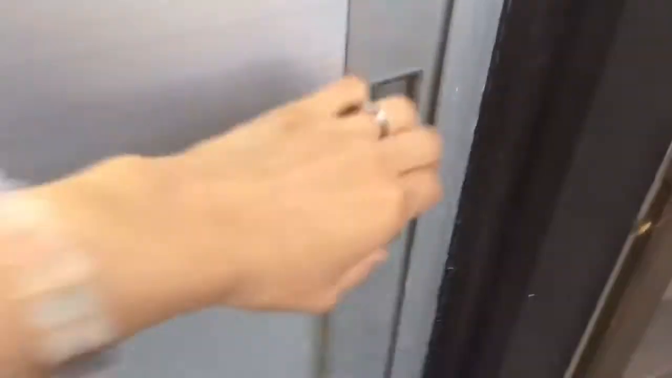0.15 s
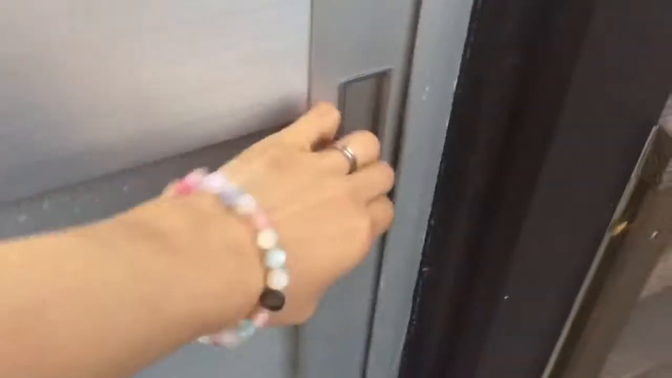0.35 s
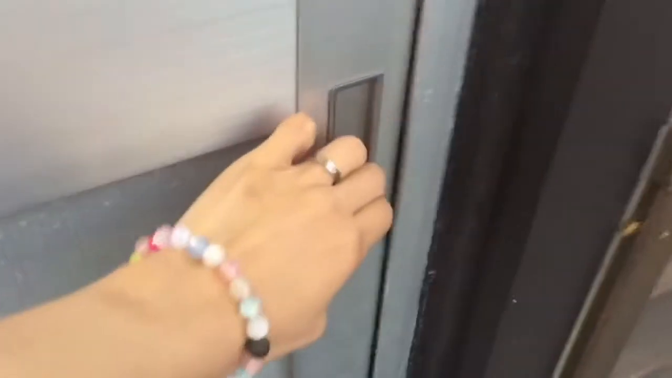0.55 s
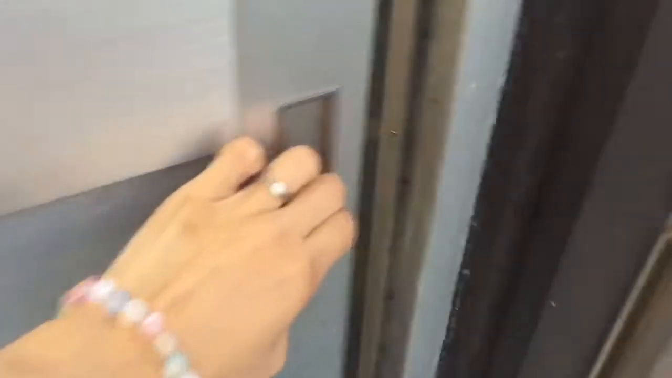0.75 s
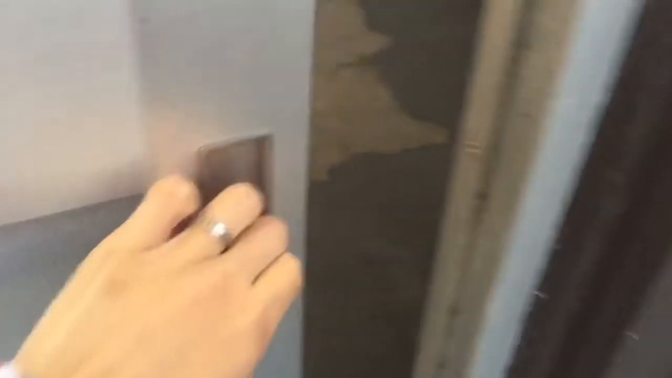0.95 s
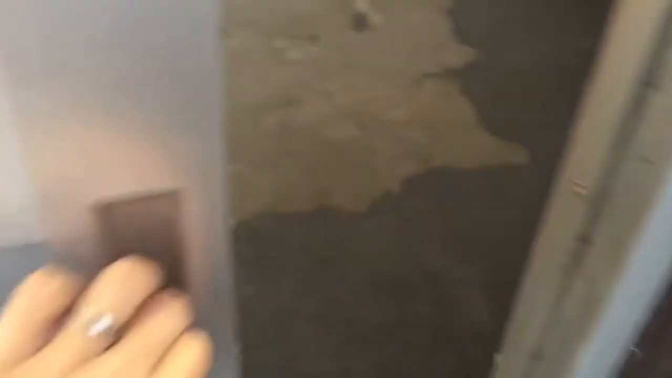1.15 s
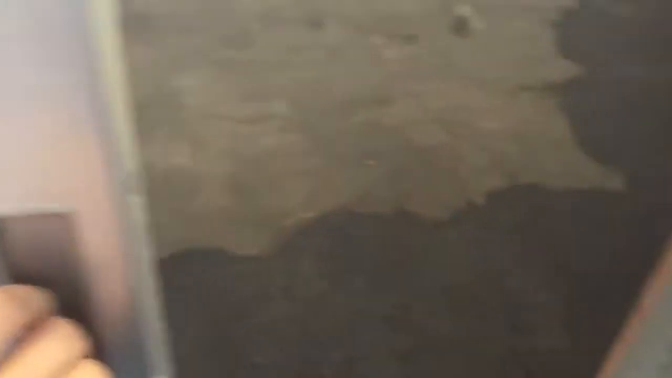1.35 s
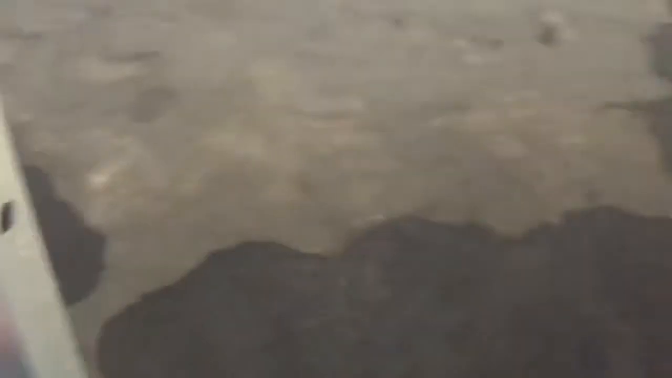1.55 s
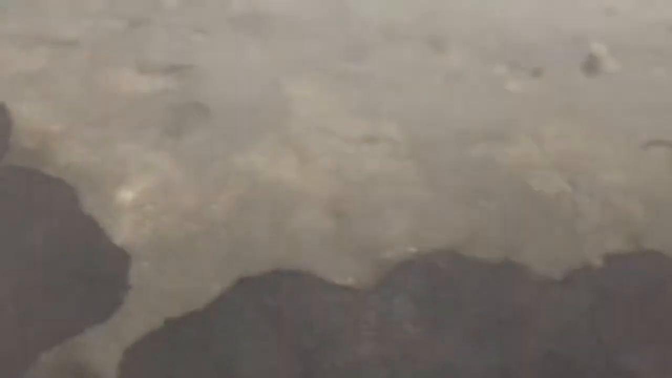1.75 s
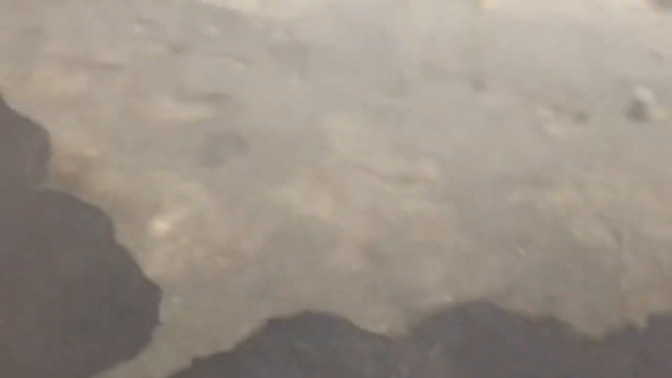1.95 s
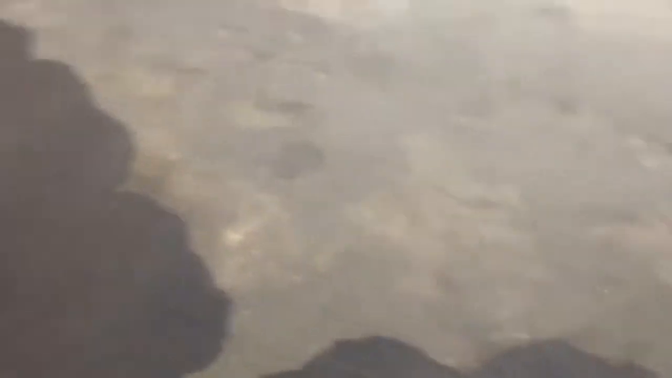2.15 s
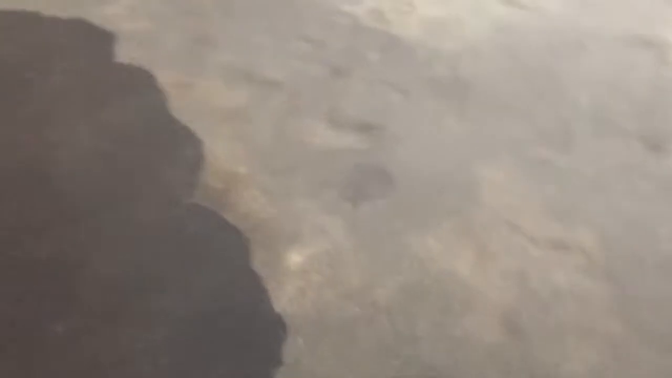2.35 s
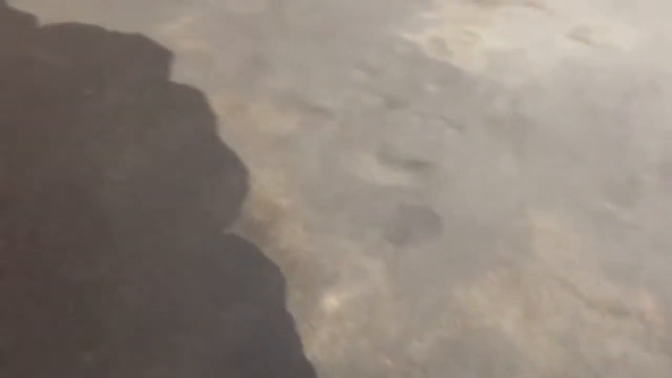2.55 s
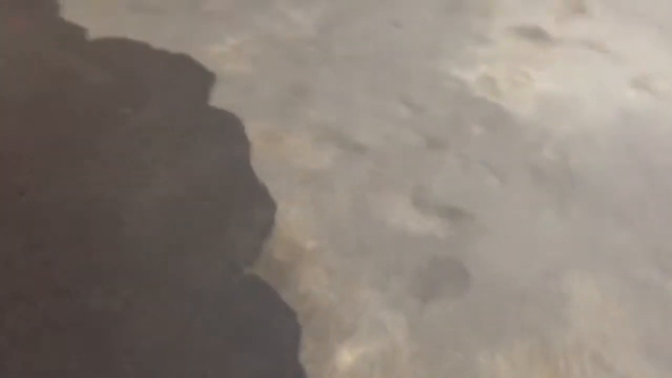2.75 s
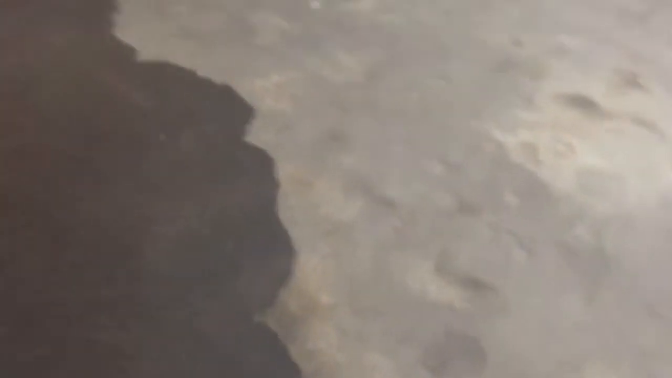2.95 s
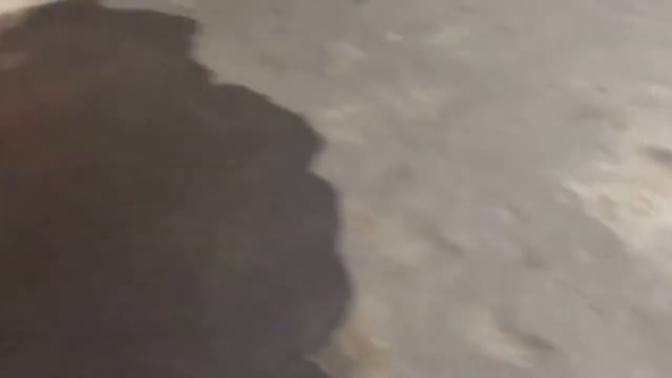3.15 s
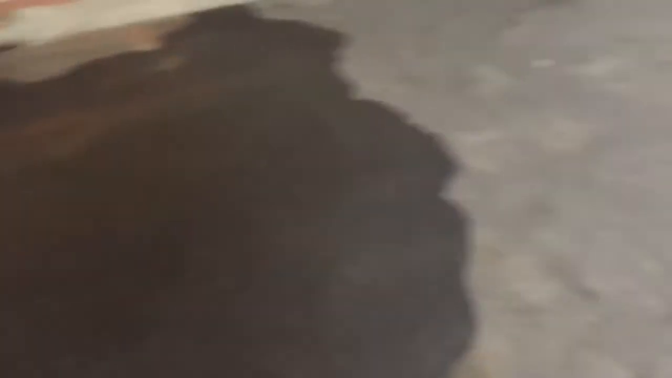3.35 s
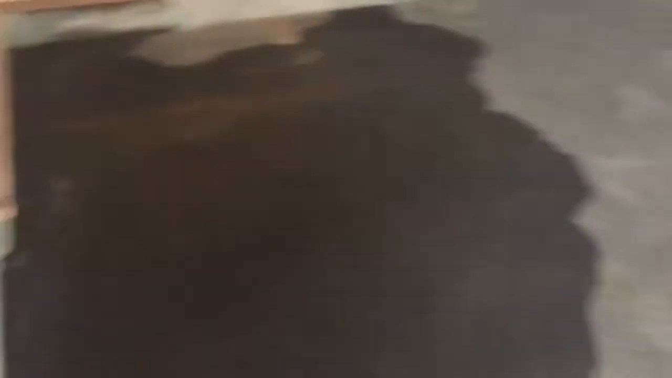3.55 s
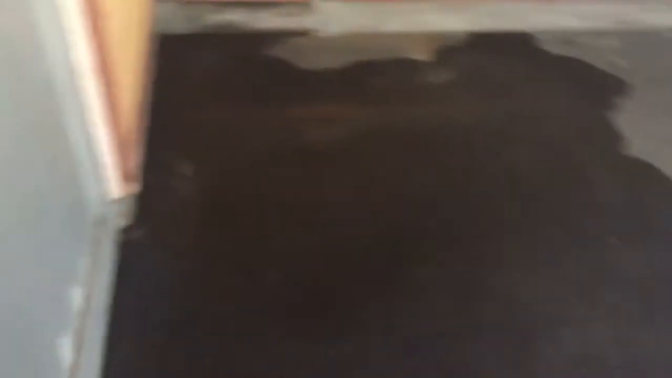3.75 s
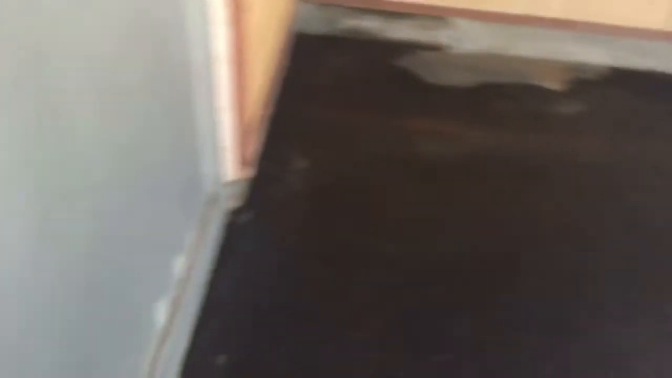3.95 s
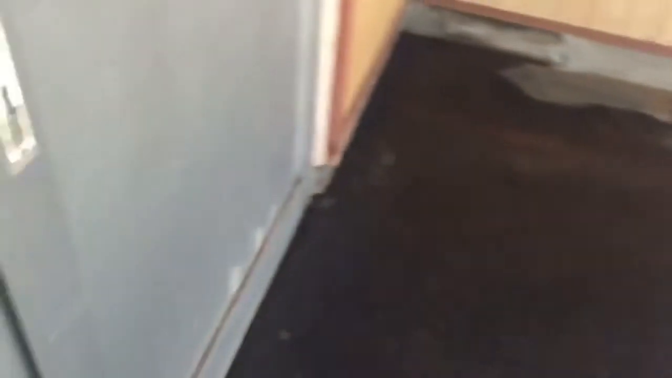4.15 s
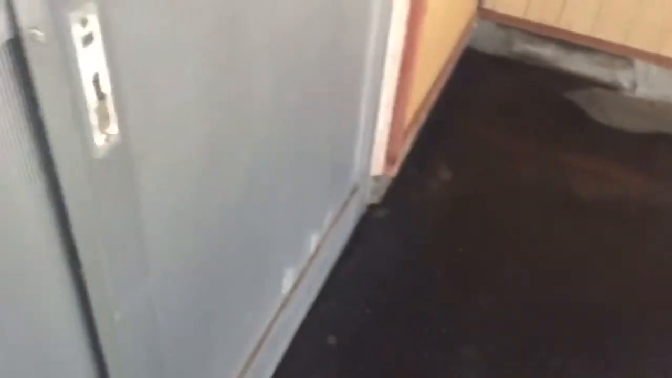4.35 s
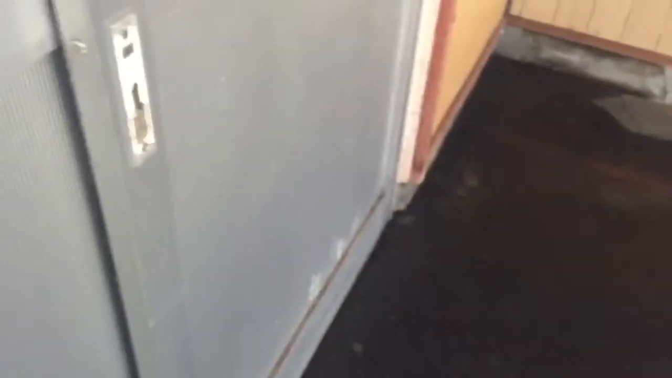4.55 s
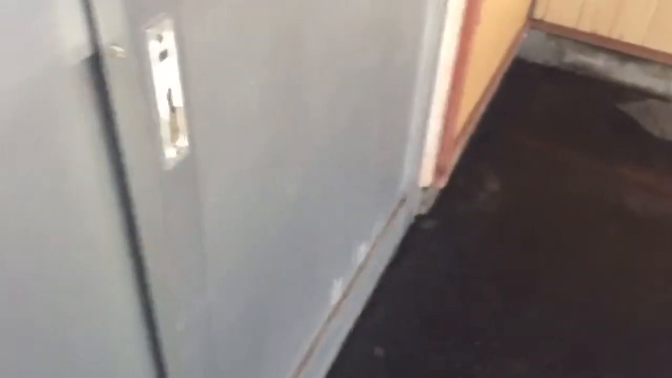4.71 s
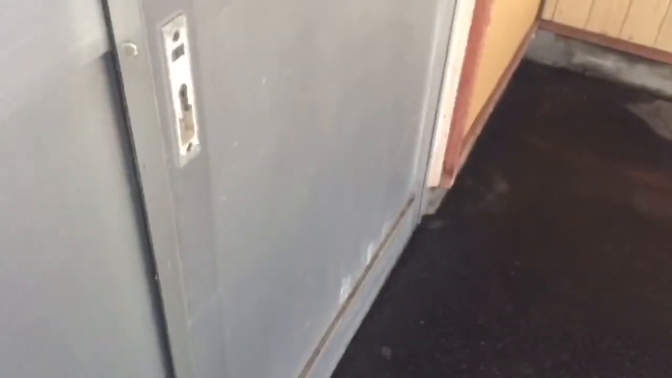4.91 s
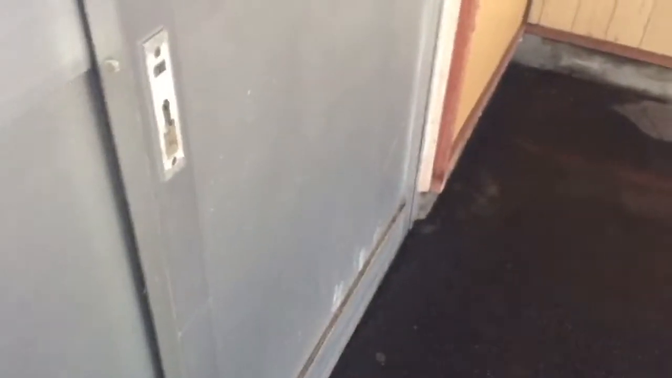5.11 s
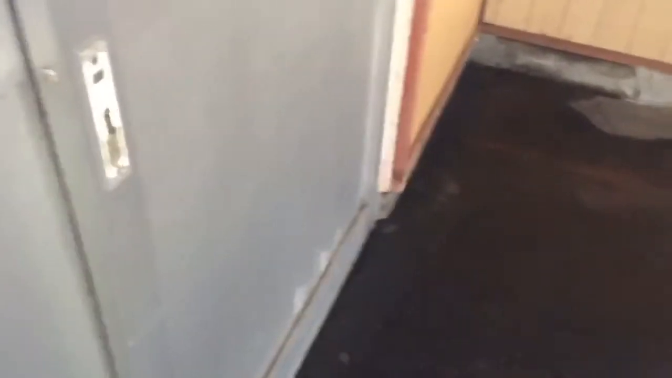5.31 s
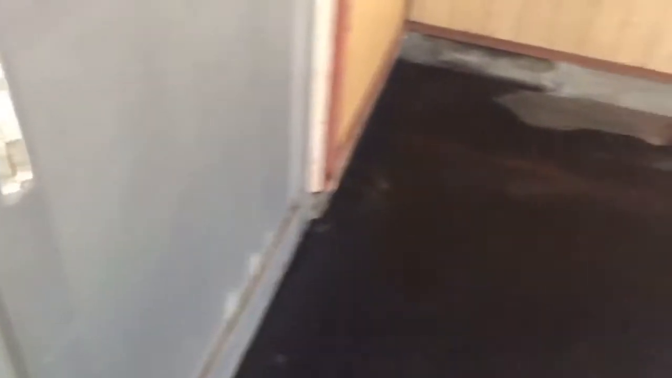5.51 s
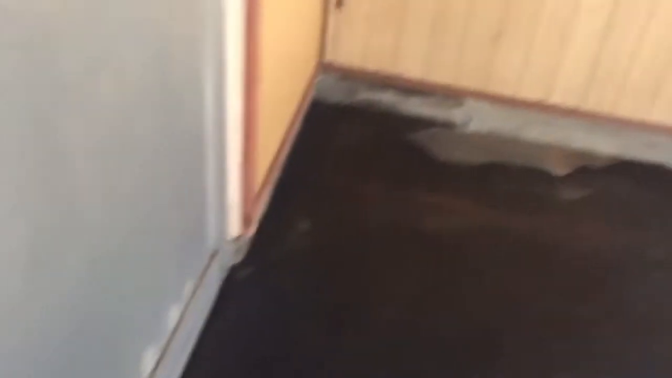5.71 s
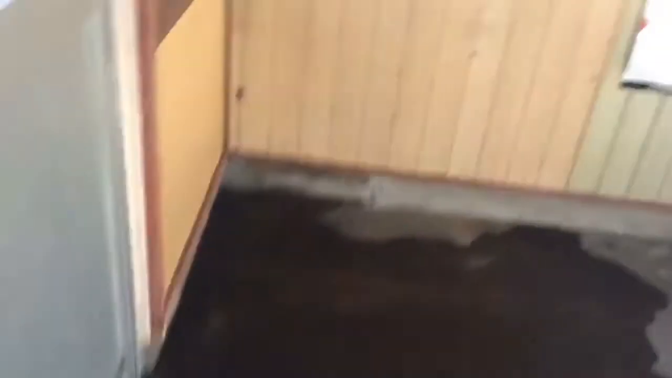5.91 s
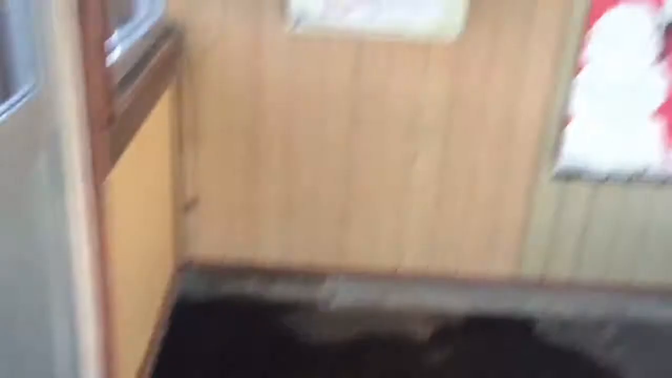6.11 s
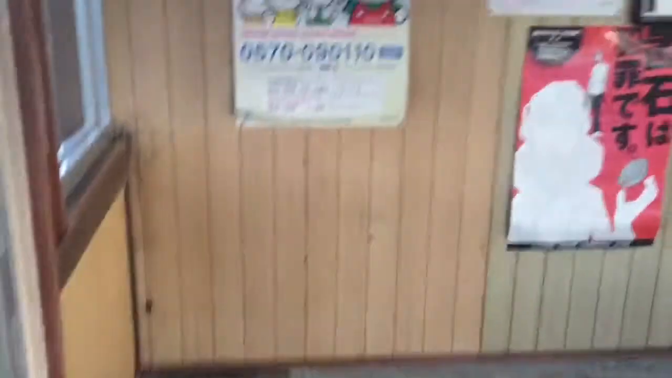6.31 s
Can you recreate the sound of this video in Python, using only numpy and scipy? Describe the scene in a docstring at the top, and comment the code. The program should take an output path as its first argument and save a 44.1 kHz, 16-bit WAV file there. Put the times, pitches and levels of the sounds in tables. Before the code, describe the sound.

After faint bead clicks, an aluminium door rumbles open along its track, falls quiet, then rattles closed and ends in two solid thumps.

```python
"""A faint outdoor hiss with small bead clicks comes first, then a knock and fingers brushing metal.
A light metal-framed door is rolled open along its track, left, and rolled shut again at a small entrance.
Rough rollers shake panel and frame, a roller's flaw ticks among a few gritty snaps, the frame scuffs its guide.
Knocks, footfalls, jolts of the rolling door and small metal rings sound around it. Noise bands make the hiss;
random bumps drive resonances for rolling and rubbing; dying sines and noise bursts make the separate blows."""
import sys
import numpy as np
from scipy import signal
from scipy.fft import rfft, irfft
from scipy.io import wavfile

SR = 44100
rng = np.random.default_rng(int(sys.argv[2]) if len(sys.argv) > 2 else 0)


def linear_from_db(decibels):
    """Turn decibels (scalar or array-like) into linear amplitude factors; 0 gives 1."""
    return 10 ** (np.asarray(decibels, float) / 20)


def materialize(psi):
    """Save the field psi as 16-bit PCM at rate SR to the path in sys.argv[1].

    A 1-D psi becomes a single channel; in a 2-D psi each row is a channel.
    """
    bounded = np.clip(np.atleast_2d(psi).T, -1, 1)
    quanta = np.round(bounded * 32767).astype(np.int16)
    wavfile.write(sys.argv[1], SR, quanta)


N = 285471   # length [samples]


def rms_one(x):
    """Scale to unit rms."""
    return x / np.sqrt(np.mean(x ** 2) + 1e-20)


def in_time(rows):
    """Draw each column of a timed table as a curve, sample by sample."""
    s, *columns = np.transpose(rows)
    return np.array([np.interp(np.arange(N) / SR, s, c) for c in columns])


def drift(rate):
    """Slow random wandering of spread 1: noise smoothed twice with a corner at rate [Hz]."""
    r = np.exp(-80 * np.pi * rate / SR)   # one step every 40 samples
    noise = rng.standard_normal(N // 40 + 2002)
    slow = signal.lfilter([1], [1, -2 * r, r * r], noise)[2000:]   # skip the filter's start
    return np.interp(np.arange(N) / 40, np.arange(len(slow)), rms_one(slow))


def coloured(x, spectrum):
    """Shape steady noise by a spectrum; rms 1."""
    hz, db = np.transpose(spectrum)
    grid = np.fft.rfftfreq(len(x), 1 / SR) + 1
    gain = linear_from_db(np.interp(np.log(grid), np.log(hz), db))
    return rms_one(irfft(rfft(x) * gain, len(x)))


def resonance(x, hz, width_hz):
    """Let through one band, like something that rings at hz; gain 1 on top."""
    r = np.exp(-np.pi * width_hz / SR)
    feedback = [1, -2 * r * np.cos(2 * np.pi * hz / SR), r * r]
    return signal.lfilter(np.array([1, 0, -1]) * (1 - r * r) / 2, feedback, x)


def ring(count, hz, t60):
    """A dying sine that falls 60 dB in t60 seconds."""
    t = np.arange(count) / SR
    return np.sin(2 * np.pi * hz * t) * linear_from_db(-60 * t / t60)


def add(out, s, sound):
    """Mix a sound in at time s."""
    i = round(s * SR)
    out[i:i + len(sound)] += sound[:N - i]


def roughness(per_s, spread_db, lumpy_db):
    """Bumps on a rough surface: random clicks of uneven size, coming in lumps."""
    sizes = linear_from_db(spread_db * np.minimum(rng.exponential(1, N), 4)) * rng.standard_normal(N)
    hits = rng.random(N) < per_s / SR
    return sizes * hits * linear_from_db(lumpy_db * drift(11.5)) + 1e-18


def shaken(modes, force, wander_db):
    """Resonances side by side under one force; each swells and fades as the contact moves."""
    total = 0
    for k, (hz, width, db) in enumerate(modes):
        # filtered twice so that the gaps between resonances stay quiet
        mode = resonance(resonance(force, hz, width), hz, 0.93 * width)
        total = total + (-1) ** k * linear_from_db(db + wander_db * drift(9.7)) * mode
    return rms_one(total)


# surroundings: (time [s], street hiss level [dB], room tone level [dB], whine level [dB])
AIR = [(0, -64.5, -81, -76), (.7, -61.5, -86, -82), (2.3, -83, -65.5, -69), (3.1, -70, -67, -107),
       (4.5, -91, -71, -96), (6.47, -77, -67.5, -85)]
# colour of the street hiss: (pitch [Hz], relative level [dB])
STREET_COLOUR = [(15, -16), (40, 4), (527, -19.5), (981, -18.5), (1930, -26), (2390, -10.5), (2810, -20.5),
                 (4330, -24), (10800, -36), (15800, -18.5)]
# colour of the room tone: (pitch [Hz], relative level [dB])
ROOM_COLOUR = [(15, -54), (30, -5), (60, 10), (174, 0.5), (812, -11.5), (981, -11), (1470, -12),
               (7830, -21), (8730, -23.5), (15800, -25.5)]
WHINE_HZ, WHINE_WIDTH_HZ = 2344, 61


def surroundings():
    """Street hiss, room tone and a faint narrow whine are steady noises that follow level curves."""
    street, room, whine = linear_from_db(in_time(AIR))
    narrow = resonance(rng.standard_normal(N), WHINE_HZ, WHINE_WIDTH_HZ)
    narrow = resonance(narrow, WHINE_HZ, WHINE_WIDTH_HZ)
    out = street * coloured(rng.standard_normal(N), STREET_COLOUR)
    out += room * coloured(rng.standard_normal(N), ROOM_COLOUR)
    return out + whine * rms_one(narrow)


# beads and nails clicking: (time [s], level [dB], crack pitch [Hz], ringing level against the click [dB])
BEAD_CLICKS = [(0.017, -49, 13100, -7), (0.023, -38.5, 3260, -12), (0.2142, -40, 2450, -32),
               (0.433, -39, 8300, 0), (0.497, -54.5, 8420, 3.5), (0.551, -40, 8000, -1),
               (1.159, -42, 3000, -11), (3.378, -59, 4500, -30), (3.569, -42.5, 7200, -8),
               (4.282, -39, 14000, -22)]
# ringing of a bead: (pitch [Hz], typical level [dB], time to fall 60 dB [s])
BEAD_MODES = [(5670, -9.5, 0.028), (8650, -5, 0.061), (2460, -9, 0.056), (13500, -4, 0.015)]


def beads():
    """Each click is a tiny dry crack; it strikes every mode with a strength of its own."""
    out, t = np.zeros(N), np.arange(4000) / SR
    strengths = rng.normal(0, 3, (len(BEAD_CLICKS), len(BEAD_MODES)))   # [dB]
    for (s, db, crack_hz, ring_db), own in zip(BEAD_CLICKS, strengths):
        tone = sum(linear_from_db(level_db + o) * ring(len(t), hz, t60)
                   for (hz, level_db, t60), o in zip(BEAD_MODES, own))
        noise = rng.standard_normal(len(t))
        width = 0.89 * crack_hz
        band = resonance(resonance(noise, crack_hz, width), crack_hz, width)
        crack = rms_one(linear_from_db(-18) * noise + band) * linear_from_db(-60 * t / 0.028)
        add(out, s, linear_from_db(db) * (linear_from_db(ring_db) * tone + crack / 2))
    return out


# knocks, footfalls and jolts of the rolling door:
# (time [s], level [dB], centre pitch [Hz], crack against blow [dB], hollow ring against blow [dB])
BLOWS = [(0.297, -40.5, 380, -8, -12), (1.082, -22.5, 210, -37, -26), (1.111, -24, 666, -29, -4.5),
         (2.5242, -44, 2200, -10, -11.5), (2.5853, -27.5, 746, -24, -11), (3.1925, -35.5, 760, 10.5, -11.5),
         (3.2216, -25, 715, -25, -7.5), (3.785, -28, 564, -13, -5), (3.842, -25.5, 910, -32, -7),
         (4.084, -25.5, 800, -5.5, -3.5), (4.335, -31.5, 600, 10.5, -2), (4.399, -27.5, 557, -18, -2),
         (4.7704, -22, 830, -30, -11.5), (4.782, -28, 770, -19, -12), (5.435, -23.5, 840, -13, -8),
         (5.903, -47, 350, -3, -7.5), (5.914, -34.5, 345, -3.5, -25), (6.184, -38.5, 303, -25, -34)]
# the entrance's hollow ring: (pitch [Hz], width [Hz], level before the lean [dB], time to fall 60 dB [s])
ENTRANCE = [(350, 160, -6, 0.25), (600, 69, -13, 0.32), (735, 206, -8, 0.53), (876, 200, -18, 0.7),
            (1250, 226, -7.5, 0.54), (1550, 230, -8.5, 0.37), (1940, 380, -9.5, 0.15),
            (2520, 330, -14, 0.51), (3250, 380, -33, 0.31)]
HOLLOW_LEAN_DB = 2   # the ring weakens per octave away from the blow's centre
BOUNCE_S, BOUNCE_DB = 0.0095, -8   # every blow bounces once


def knocks_footfalls_and_jolts():
    """A rounded blow and a crack; the entrance rings on as dying noise."""
    out, t = np.zeros(N), np.arange(SR // 2) / SR
    for s, db, hz, crack_db, hollow_db in BLOWS:
        noise = rng.standard_normal((2, len(t)))
        soft = (1 - np.exp(-t * hz * 4.84)) ** 2   # contact lasts a part of a cycle
        tone = ring(len(t), hz, 7.0 / hz)
        tone += linear_from_db(2.0) * ring(len(t), 1.43 * hz, 2.56 / hz)
        tone += linear_from_db(-30.5) * ring(len(t), 2.44 * hz, 8.4 / hz)
        blow = 2 * soft * tone
        burst = linear_from_db(crack_db - 60 * t / 0.0092) * noise[0]
        crack = 2.1 * resonance(resonance(resonance(burst, 1200, 2200), 1600, 3100), 1400, 3100)
        swell = 1 - np.exp(-t / 0.00093)   # echoes need a moment to build
        sharp = linear_from_db(crack_db / 2)   # a harder crack wakes the upper modes more
        hollow = 0
        for f, width, level_db, t60 in ENTRANCE:
            lean_db = HOLLOW_LEAN_DB * abs(np.log2(f / hz))
            band = rms_one(resonance(resonance(noise[1], f, width), f, 1.13 * width))
            hollow = hollow + linear_from_db(level_db - lean_db - 60 * t / t60) * (sharp if f > 1100 else 1) * band
        add(out, s + BOUNCE_S, linear_from_db(db + BOUNCE_DB) * (blow + crack))
        add(out, s, linear_from_db(db) * (blow + crack + linear_from_db(hollow_db) * swell * hollow))
    return out


# weight lands on floor or jamb: (time [s], level [dB])
THUDS = [(0.298, -38), (4.78, -19), (5.434, -15.5), (5.916, -28), (6.187, -32.5), (6.209, -38)]


def thuds():
    """Floor and jamb answer a landing weight with two low modes."""
    out, t = np.zeros(N), np.arange(SR // 2) / SR
    for s, db in THUDS:
        tone = ring(len(t), 78.0, 0.054) + ring(len(t), 120.0, 0.047)
        add(out, s, linear_from_db(db) * (1 - np.exp(-t / 0.0069)) * tone)
    return out


# fingers brush the metal:
# (time [s], level [dB], strongest pitch [Hz], treble against body [dB], time to fall 60 dB [s])
BRUSHES = [(0.3151, -43, 3870, -0.5, 0.2), (0.339, -56, 13300, 24, 0.047),
           (0.3585, -63.5, 5700, 20.5, 0.19), (0.6, -55.5, 1820, -24.5, 1.3), (0.665, -58, 2350, 4, 1.1),
           (2.711, -59.5, 6960, -13, 1), (2.829, -51.5, 2290, -35, 0.46), (2.84, -57, 2270, -8, 0.021),
           (2.835, -38, 7150, -36, 0.06), (2.943, -54.5, 4370, -5, 0.42), (2.982, -55, 2180, -11, 0.3),
           (2.985, -49, 6900, -8, 0.2), (5.301, -50.5, 1360, -15, 0.5), (5.3702, -46.5, 3010, -10, 0.33),
           (5.786, -58, 3600, -6, 0.22)]
# the frame scuffs its guide: (time [s], level [dB], strongest pitch [Hz], time to fall 60 dB [s])
GUIDE_SCUFFS = [(0.709, -39.5, 3720, 1), (0.717, -32.5, 5300, 0.044), (0.7814, -50, 2430, 1),
                (0.812, -41.5, 4100, 0.053), (0.893, -38, 4700, 0.031), (0.844, -35, 3240, 0.29),
                (0.94, -34.5, 2720, 0.1), (0.955, -29.5, 2050, 0.1), (1.217, -35.5, 4150, 0.12),
                (1.368, -51, 4120, 0.062), (1.43, -60, 5670, 1), (1.5263, -33, 2300, 1),
                (1.609, -43, 2800, 0.31), (1.737, -35.5, 3060, 0.45), (1.819, -30, 2070, 1),
                (1.8699, -35, 3070, 0.61), (3.4338, -36.5, 3280, 0.56), (3.486, -37, 2520, 0.45),
                (3.8207, -34.5, 2700, 0.55), (4.0043, -32, 2080, 0.49), (4.246, -27, 3350, 0.19),
                (4.2794, -34, 3070, 0.86), (4.37, -33, 3420, 0.33)]
# the frame rattles against jamb or guide:
# (time [s], level [dB], strongest pitch [Hz], treble against body [dB], time to fall 60 dB [s])
JAMB = [(3.2, -39, 3000, -24, 0.75), (4.15, -34, 3600, -22, 0.05), (4.773, -39, 2000, -34, 0.6),
        (5.437, -38.5, 3960, -7, 0.044), (5.46, -43, 2600, -20, 0.5)]
# colour of the gritty hiss: (pitch [Hz], relative level [dB])
SCUFF_COLOUR = [(880, 0.5), (1500, 3), (1920, 8.5), (2760, 2.5), (3230, 1.5), (3570, 3.5), (5040, 0.5),
                (9560, -10.5), (10300, -22), (13500, -21.5), (15800, -20)]
# resonances of the rail, before the shifts below: (pitch [Hz], width [Hz], level [dB])
RAIL = [(1910, 90, 3), (2240, 70, 3), (2460, 70, 1), (2900, 70, 2), (3290, 60, 5), (4050, 60, 1),
        (4500, 80, -2), (5650, 100, -3), (6590, 70, -3), (7350, 90, -4), (7750, 80, -7), (8650, 80, -7),
        (11200, 150, -12)]
SCUFF_TREBLE_DB, TREBLE_LOSS_PER_DB, SOFT_SCUFF_DB = -10, 0.5, -34.5   # harder guide scuffs are duller
RAIL_SHIFT, RAIL_SPREAD_DB = .03, 3   # chance in each mode's pitch (as a share) and level
RAIL_DB, RAIL_FLICKER_DB = -4.5, 5   # rail against hiss; how far each mode comes and goes
JUDDER_HZ, JUDDER_DB = 15.6, 0.5   # stick-slip makes the level waver
SQUEAK_DB, SQUEAK_WIDTH = 5, .05   # width as a share of its pitch
RING_ON_DB, RING_ON_WIDTH_HZ = -2, 32   # rubbed metal rings on after the scuff


def scuffs():
    """Dry friction: gritty hiss that sets the rail ringing, starts fast, holds and dies, treble first."""
    out, t = np.zeros(N), np.arange(SR // 2) / SR
    bumps = roughness(6000, spread_db=-2.5, lumpy_db=0.5)
    rub = coloured(bumps, SCUFF_COLOUR)
    treble = signal.butter(2, [7000, 15600], "band", fs=SR, output="sos")
    guide = [(s, db, hz, SCUFF_TREBLE_DB - TREBLE_LOSS_PER_DB * (db - SOFT_SCUFF_DB), t60)
             for s, db, hz, t60 in GUIDE_SCUFFS]
    judder = linear_from_db(JUDDER_DB * drift(JUDDER_HZ))
    flicker = linear_from_db(RAIL_FLICKER_DB * np.array([drift(JUDDER_HZ / 2) for _ in RAIL]))
    rows = guide + list(BRUSHES) + list(JAMB)
    # the contact moves: each scuff finds the rail's modes shifted and reweighted
    chance = rng.standard_normal((len(rows), 2, len(RAIL)))
    for (s, db, hz, top_db, t60), (shifts, weights) in zip(rows, chance):
        here = slice(round(s * SR), round(s * SR) + len(t))
        force = bumps[here]
        rail = 0
        for (f, width, level_db), shift, weight, gain in zip(RAIL, shifts, weights, flicker):
            pitch = f * (1 + RAIL_SHIFT * shift)
            mode = resonance(resonance(force * gain[here], pitch, width), pitch, 2 * width)
            rail = rail + linear_from_db(level_db + RAIL_SPREAD_DB * weight) * mode
        piece = rub[here] + linear_from_db(RAIL_DB) * rms_one(rail)
        lean = resonance(piece, hz, .5 * hz)
        squeak = linear_from_db(SQUEAK_DB) * resonance(piece, hz, SQUEAK_WIDTH * hz)
        body = rms_one(linear_from_db(3.0) * piece + lean + squeak)
        top = linear_from_db(top_db) * rms_one(signal.sosfilt(treble, piece + linear_from_db(-20.0) * rms_one(force)))
        if hz < 5000:   # in lower scuffs the body gives up treble to the top layer
            body = body - signal.sosfilt(treble, body)
        fade_db = (-60 * np.maximum(t - .01, 0) / max(t60, .01))[:len(piece)]
        start = np.minimum(t / 0.0019, 1)[:len(piece)] * judder[here]
        body = linear_from_db(fade_db) * body
        ring_on = linear_from_db(RING_ON_DB) * resonance(body, hz, RING_ON_WIDTH_HZ)
        sound = body + linear_from_db(1.09 * fade_db) * top + ring_on
        add(out, s - .002, linear_from_db(db) / 3 * start * sound)   # peaks stand about three times the rms
    return out


# what the rollers shake, the swaying door: (pitch [Hz], width [Hz], relative level [dB])
SWAY = [(57, 17.4, 3), (73.5, 7.9, 6.5), (92.6, 19.8, 7)]
# humming panel: (pitch [Hz], width [Hz], relative level [dB])
PANEL = [(129.2, 45, 5.5), (159.7, 36, -11)]
# drumming, the first row deep and the others upper: (pitch [Hz], width [Hz], relative level [dB])
DRUM = [(208.1, 88, 5), (260.8, 32, -3.5), (337, 36, -5.5)]
# buzzing frame: (pitch [Hz], width [Hz], relative level [dB])
FRAME = [(403, 218, 6), (543, 48, 8), (611.5, 69, 10), (848, 310, 0.5), (1110, 246, -1.5), (1258, 120, 1.5),
         (1390, 460, -6.5), (2020, 1150, -14)]
# colour of the track grit: (pitch [Hz], relative level [dB])
GRIT = [(820, 4.5), (1400, 6.5), (2220, -1.5), (2530, -0.5), (4780, -14.5), (7140, -15.5), (10400, -65),
        (11200, -29), (15500, -32)]
# opening stroke: (time [s], roller rattle [dB], panel hum [dB], door sway [dB], deep drumming [dB])
OPENING = [(0.551, -100, -65, -66, -69), (0.686, -40, -51, -40, -37.5), (.78, -38, -35.5, -41, -31.5),
           (.9, -35.5, -42, -31.5, -35), (1.08, -34.5, -40.5, -42, -33.5), (1.2, -35, -36, -38, -31.5),
           (1.5, -34.5, -35, -49.5, -35), (1.72, -35, -47, -47, -43), (2.0, -37.5, -49.5, -49.5, -43.5),
           (2.249, -47, -44.5, -65, -55.5), (2.44, -91, -56, -70, -80.5), (2.52, -99, -81, -93, -95)]
# closing stroke: (time [s], roller rattle [dB], panel hum [dB], door sway [dB], deep drumming [dB])
CLOSING = [(3.199, -70, -60.5, -71, -59), (3.38, -43.5, -41.5, -38.5, -48), (3.509, -40, -21.5, -53, -52),
           (3.6, -40.5, -38.5, -44.5, -49.5), (3.88, -39, -31, -38, -37), (4.2, -39, -38, -47, -39),
           (4.36, -40.5, -29, -40, -41.5), (4.5, -40.5, -45, -40.5, -42.5), (4.62, -43.5, -32, -33.5, -45),
           (4.72, -45.5, -42.5, -46, -49), (4.9, -51, -46, -40, -57), (5.1, -59.5, -49.5, -47.5, -56),
           (5.38, -54, -44, -49.5, -48), (5.47, -48, -41, -32, -41), (5.56, -54, -44, -40.5, -54),
           (5.66, -62, -58, -51, -66), (5.74, -77, -86, -51, -83), (5.82, -88, -92, -89, -91)]
# parts against the rattle, heard from outside (opening) and inside (closing):
# (upper drumming [dB], frame buzz [dB], track grit [dB],
#  swing of buzz [dB per dB of rattle], swing of grit [dB per dB of rattle])
PARTS = [(-13, -6.5, -10.5, 1.98, 0.5), (-3, 1, -12, 1.34, 2.87)]
LOUD_ROLL_DB = -38   # rattle level around which buzz and grit swing
RATTLE_DB, RATTLES_PER_S, RATTLE_WANDER_DB = -14, 400, 2.5   # grit rattles the rail


def rolling():
    """Roller roughness drives panel, frame and track; silent while the door stands."""
    bumps = roughness(7000, spread_db=1.0, lumpy_db=2.0)
    knocking = roughness(900, spread_db=1.5, lumpy_db=0.0)
    swaying = shaken(SWAY, roughness(900, spread_db=2.5, lumpy_db=2.0), wander_db=-1.0)
    humming = shaken(PANEL, roughness(900, spread_db=-0.5, lumpy_db=-1.0), wander_db=1.0)
    deep_drum = shaken(DRUM[:1], knocking, wander_db=0.0)
    upper_drum = shaken(DRUM[1:], knocking, wander_db=4.5)
    buzzing = shaken(FRAME, roughness(2000, spread_db=2.5, lumpy_db=.8), wander_db=2.0)
    rail_bumps = roughness(RATTLES_PER_S, spread_db=1.5, lumpy_db=1.0)
    rail = shaken(RAIL[:7], rail_bumps, wander_db=RATTLE_WANDER_DB)
    gritty = rms_one(coloured(bumps, GRIT) + linear_from_db(RATTLE_DB) * rail)
    parts = np.array([swaying, humming, deep_drum, upper_drum, buzzing, gritty])
    out, t = 0, np.arange(N) / SR
    for stroke, (upper_db, buzz_db, grit_db, *swings) in zip((OPENING, CLOSING), PARTS):
        rattle, hum, sway, deep = in_time(stroke)
        buzz, grit = (LOUD_ROLL_DB + k * (rattle - LOUD_ROLL_DB) for k in swings)
        levels = linear_from_db(np.array([sway, hum, deep, rattle + upper_db, buzz + buzz_db, grit + grit_db]))
        moving = (t > stroke[0][0]) & (t < stroke[-1][0])
        out = out + (levels * parts).sum(axis=0) * moving
    return out


# ticks of the roller's flaw, and a few gritty snaps:
# (time [s], level [dB], snap noise before filtering, against the ring [dB], ring pitch [Hz])
TICKS_AND_SNAPS = [(0.755, -27.5, -17, 1020), (0.835, -28, -22, 945), (0.8982, -25.5, -4, 940),
                   (1.0153, -20.5, -6, 1125), (1.129, -26, -10, 1160), (1.1861, -25, -11, 1140),
                   (1.3056, -22, -7, 1200), (1.364, -23, 0.5, 1240), (1.419, -28, -15, 1140),
                   (1.5366, -25.5, -17, 1250), (1.5873, -27, 0, 1240), (1.611, -31, 16, 895),
                   (1.644, -31, -23, 1310), (1.67, -36, 8, 1190), (1.6998, -21, -3, 1210),
                   (1.7594, -24, -9, 1400), (1.825, -20, 2, 1250), (1.892, -22.5, -1, 1110),
                   (1.9767, -22, -20, 1200), (2.108, -25.5, -33, 1110), (3.4672, -19, -2.5, 1250)]


def ticks_and_snaps():
    """Three quick contacts, each a brief ring on close modes with a dry snap of noise on top."""
    out, t = np.zeros(N), np.arange(1500) / SR
    soft = 1 - np.exp(-t / 0.001)
    for s, db, snap_db, hz in TICKS_AND_SNAPS:
        lags = np.cumsum(rng.uniform(0.002066, 0.005, 3) * [0, 1, 1])   # [s]
        tone = ring(len(t), hz, 0.022)
        tone += linear_from_db(-0.5) * ring(len(t), 0.73 * hz, 0.011)
        tone += linear_from_db(-16.0) * ring(len(t), 1.6 * hz, 0.055)
        for lag, size in zip(lags, linear_from_db([0, -6, -12])):
            burst = rng.standard_normal(len(t)) * linear_from_db(snap_db - 60 * t / 0.013)
            snap = 1.57 * resonance(resonance(burst, 2360, 1800), 3200, 4000)
            add(out, s + lag - .001, linear_from_db(db) * size * soft * (tone + snap))
    return out


# the standing panel is nudged: (time [s], level [dB])
NUDGES = [(2.616, -57), (2.72, -49), (2.87, -53.5), (2.953, -50)]


def nudges():
    """A nudge swells and dies in the panel's modes."""
    out, t = np.zeros(N), np.arange(SR // 2) / SR
    swell = 1 - np.exp(-t / 0.0099)
    tone = sum(linear_from_db(level_db) * ring(len(t), hz, 0.2) for hz, _, level_db in PANEL)
    for s, db in NUDGES:
        add(out, s, linear_from_db(db) * swell * tone)
    return out


# small metal rings, brushed metal and latch parts:
# (time [s], level [dB], pitch [Hz], time to fall 60 dB [s])
METAL_RINGS = [(2.838, -49, 2230, 0.18), (3.005, -62, 8100, .1), (4.907, -61, 3480, .06),
               (4.907, -63, 2600, 0.065), (5.304, -51, 2380, 0.082), (5.311, -42, 1185, 0.069),
               (5.368, -53, 3000, .03)]


def metal_rings():
    """Brushed metal and latch parts give single clear rings that start softly."""
    out, t = np.zeros(N), np.arange(SR // 4) / SR
    for s, db, hz, t60 in METAL_RINGS:
        add(out, s, linear_from_db(db) * (1 - np.exp(-t / 0.00033)) * ring(len(t), hz, t60))
    return out


def scene():
    """All sources at one microphone."""
    small = surroundings() + beads() + knocks_footfalls_and_jolts() + thuds()
    door = scuffs() + rolling() + ticks_and_snaps() + nudges() + metal_rings()
    return (small + door)[None]


def roll_off(x):
    """The treble ends steeply here."""
    return signal.sosfilt(signal.butter(12, 16460, fs=SR, output="sos"), x)


def record(dry):
    """The microphone loses the lowest bass, and a steep filter cuts the top."""
    bass_cut = signal.butter(4, 38, "high", fs=SR, output="sos")
    top_cut = signal.cheby2(12, 60, 16450, fs=SR, output="sos")   # 60 dB down from 16450 Hz
    mix = signal.sosfilt(top_cut, signal.sosfilt(bass_cut, dry))
    return roll_off(mix)


dry = scene()
out = record(dry)
materialize(out)
```